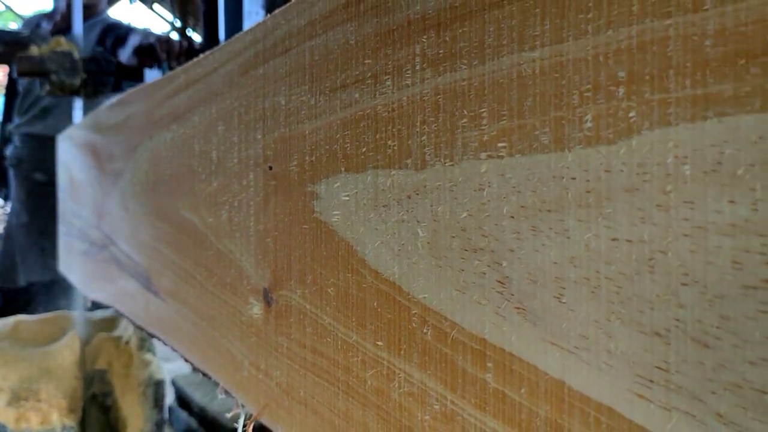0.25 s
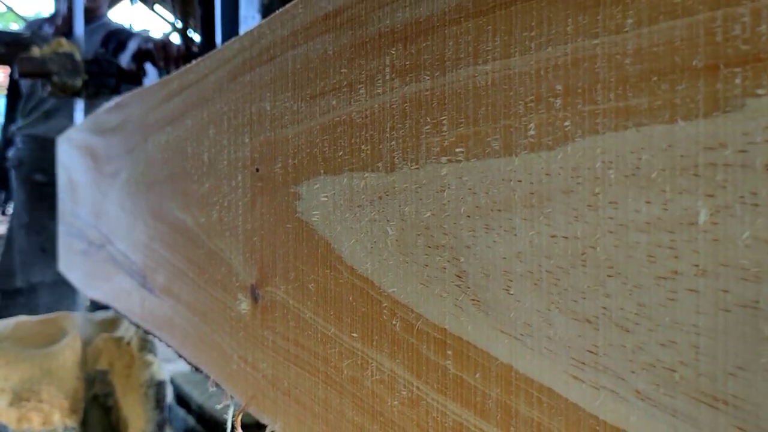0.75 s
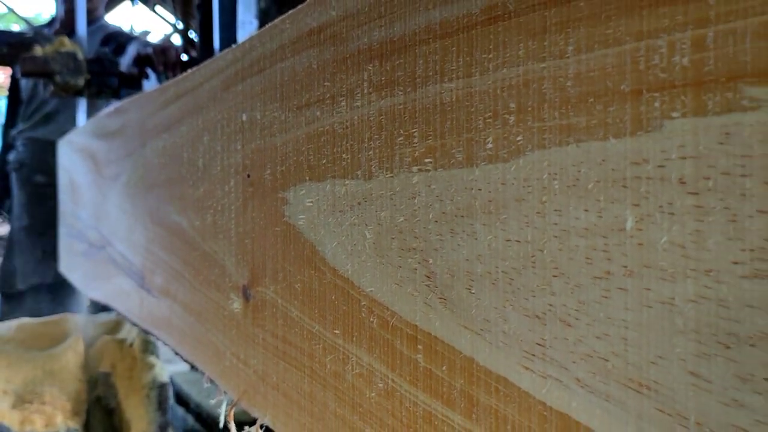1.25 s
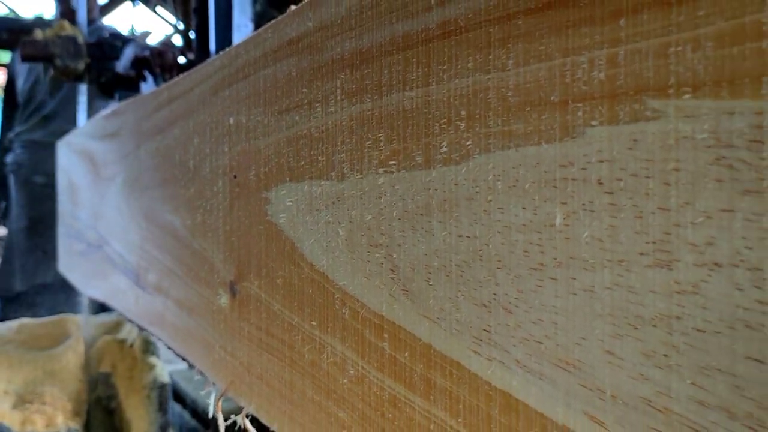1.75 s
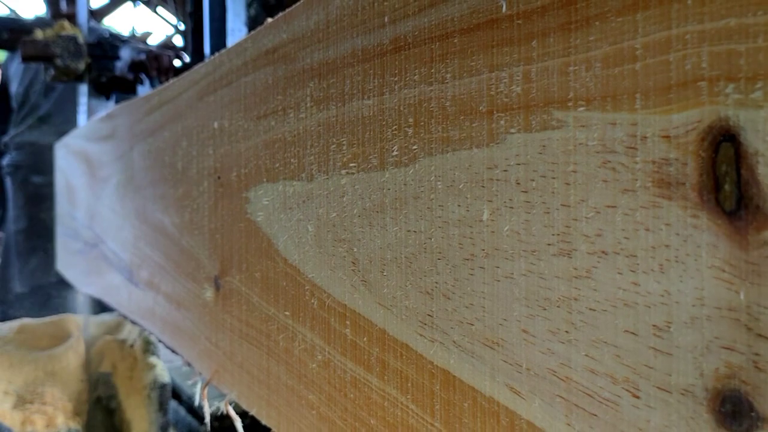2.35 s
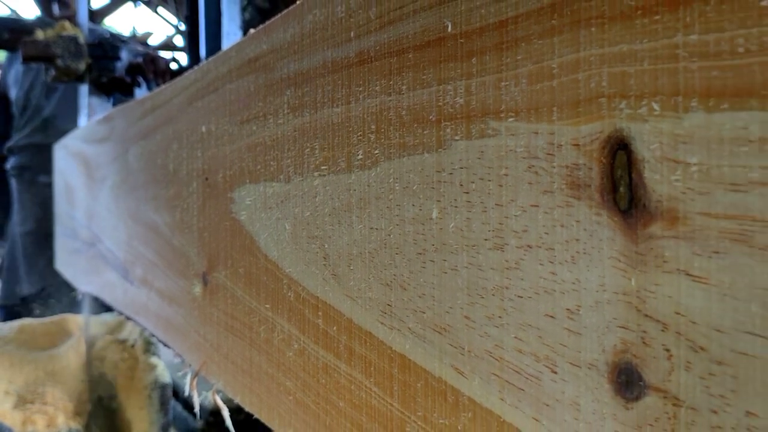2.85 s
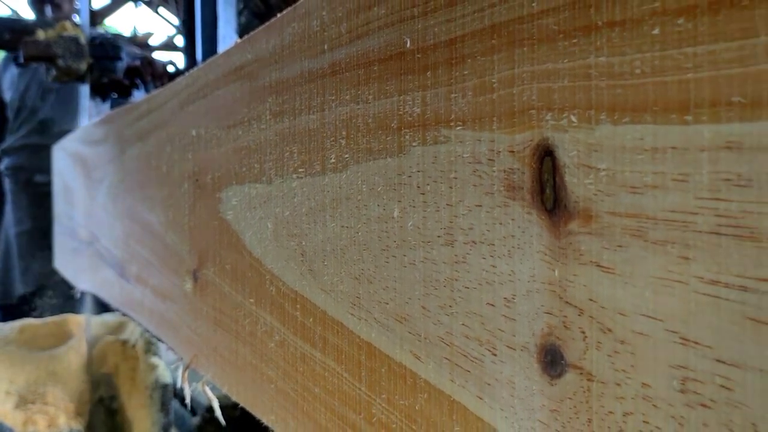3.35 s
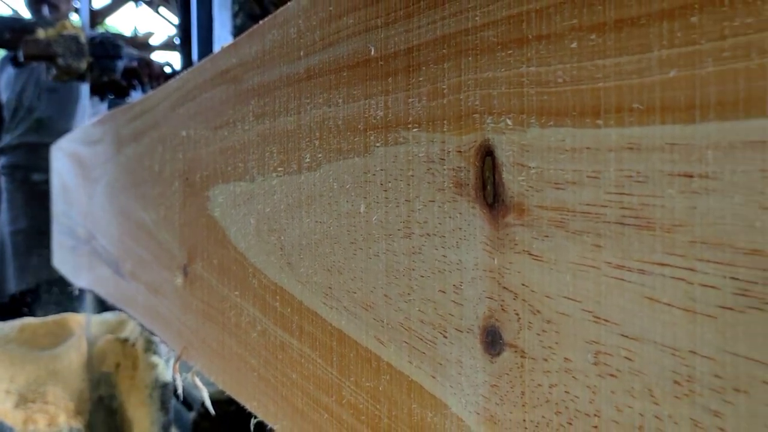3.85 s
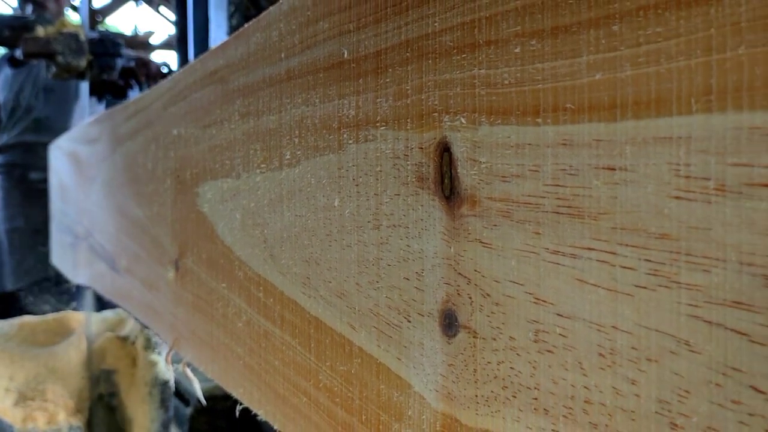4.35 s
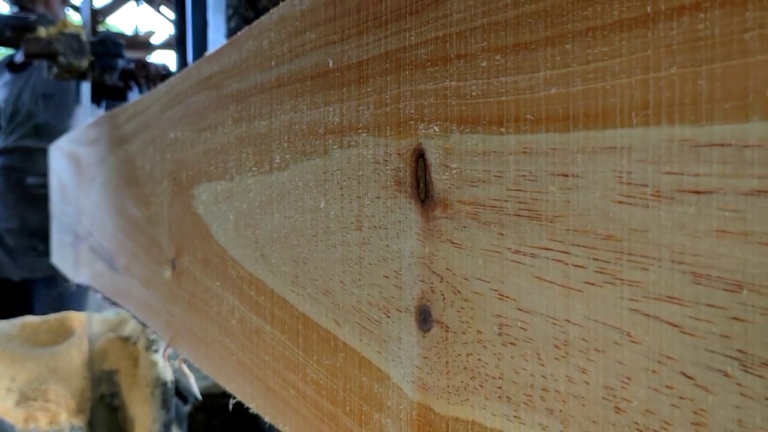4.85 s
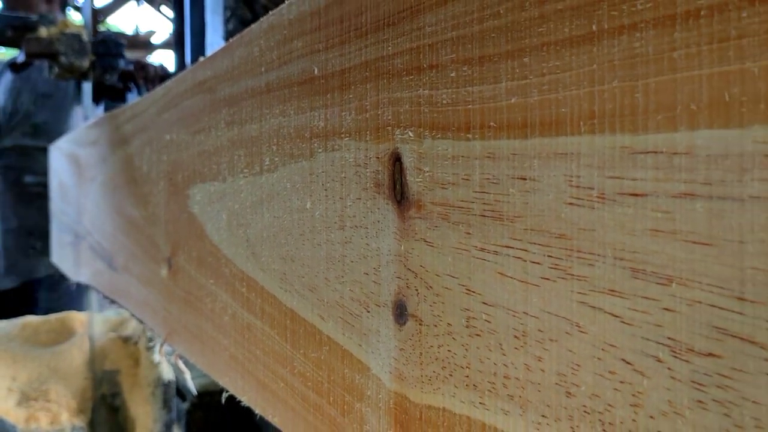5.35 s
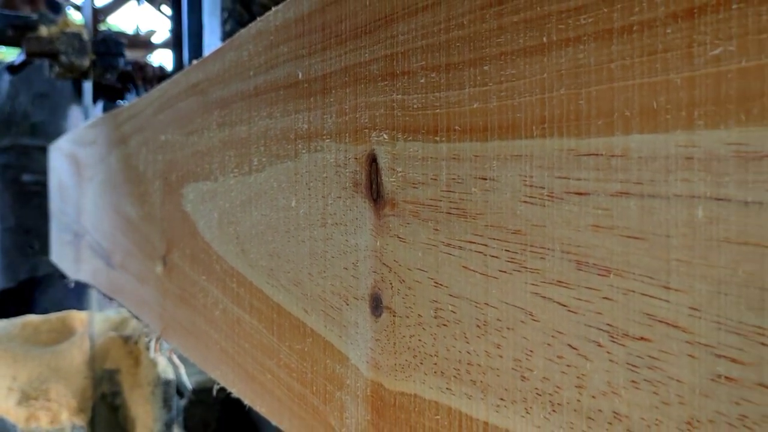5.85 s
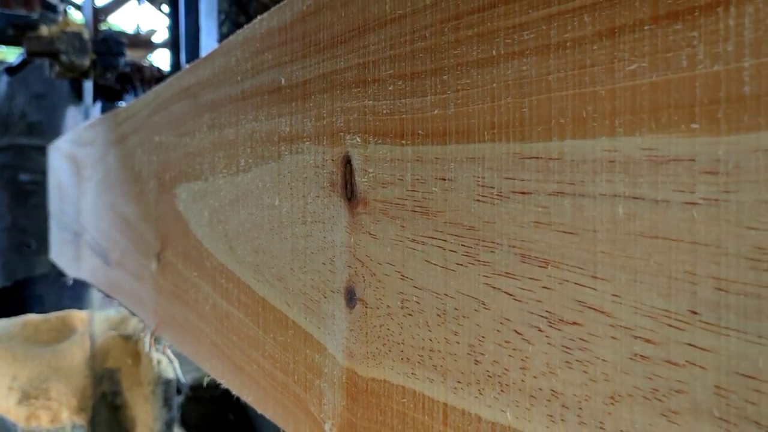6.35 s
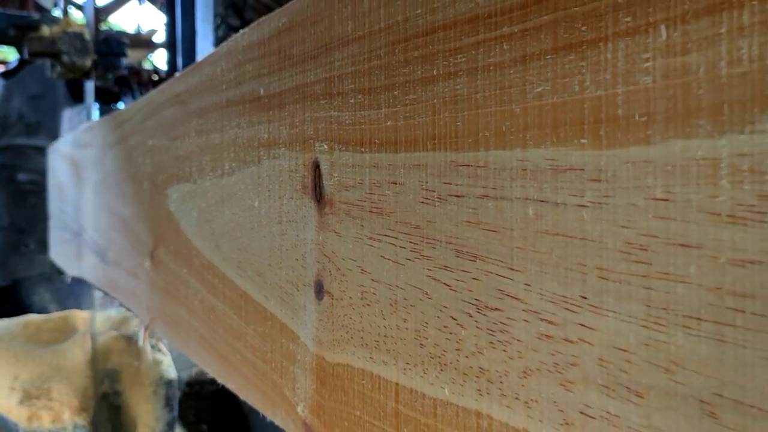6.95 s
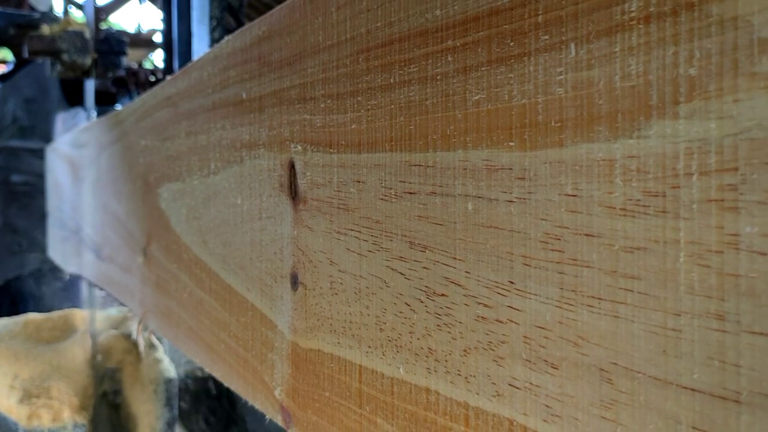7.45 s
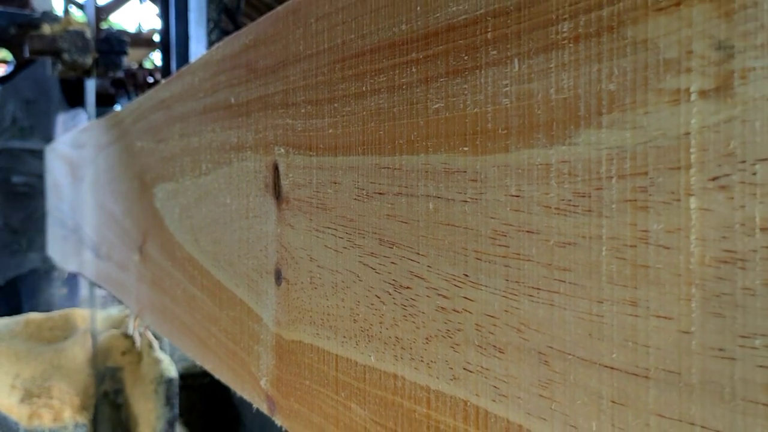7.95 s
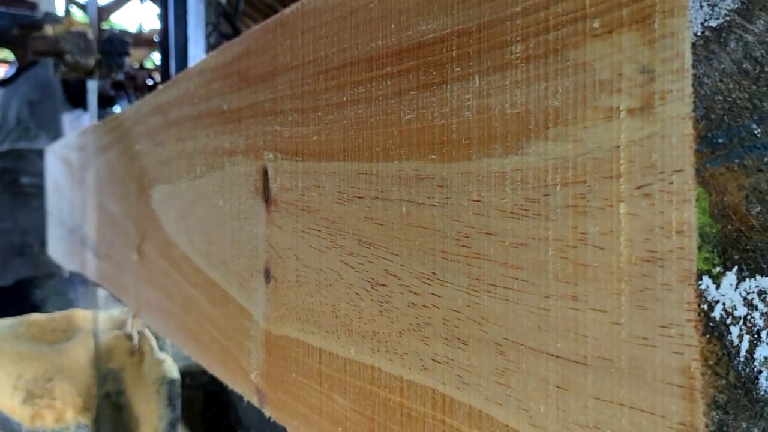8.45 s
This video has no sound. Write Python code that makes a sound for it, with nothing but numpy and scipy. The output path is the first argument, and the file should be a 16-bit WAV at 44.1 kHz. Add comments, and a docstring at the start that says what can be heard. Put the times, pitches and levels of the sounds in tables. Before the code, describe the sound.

A single-cylinder engine chugs and knocks steadily, slowing slightly, while a band saw blade rasps continuously and grittily through a wooden log.

```python
"""Under an open shed, a band mill driven by a single-cylinder four-stroke engine rips a log.
Gritty noise makes the steady rasp of the blade, with two faint whines that swell and fade.
Each engine cycle adds puffs and spits of shaped noise, knocks that ring the casing and a pulse that booms in the pipe.
The engine slows under load. Two microphones a hand apart hear engine and blade from different sides."""
import sys
import numpy as np
from scipy import signal
from scipy.io import wavfile
from scipy.ndimage import uniform_filter1d

SR = 44100
rng = np.random.default_rng(int(sys.argv[2]) if len(sys.argv) > 2 else 0)


def wav_record(signal):
    """Record a signal, one row per channel, as 16-bit PCM in the file named by sys.argv[1]."""
    frames = np.transpose(np.atleast_2d(signal))
    bounded = np.clip(frames, -1, 1)
    # unit amplitude maps onto the largest positive 16-bit level
    quanta = np.round(bounded * 32767).astype(np.int16)
    wavfile.write(sys.argv[1], SR, quanta)


N = 383669

# The engine slowing down: (time [s], crank speed [turns per minute])
CRANK_SPEED = [(0.0, 1632.8), (0.6, 1613.5), (1.3, 1583.4), (2.2, 1565.6), (3.2, 1542.1), (4.3, 1523.1),
               (5.4, 1509.8), (6.5, 1494.5), (7.6, 1477.2), (8.7, 1473.9)]
CYCLE_AT_START = -.258  # cycle count when the sound starts
# Loudness over time: (time [s], casing knocks [dB], hiss puffs [dB], blade rasp [dB])
LOUDNESS = [(0, -28.5, -31, -22), (1.5, -25.5, -30, -22.5), (3, -28, -28, -22.5),
            (4.5, -29.5, -28.5, -22.5), (6, -33.5, -26, -23), (7.5, -33.5, -29, -22), (8.7, -32, -28, -23)]

# Blade whine pitch: (time [s], pitch [multiple of the cycle rate])
WHINE_PITCH = [(0, 40.55), (1.5, 40.4), (2.5, 40.25), (4.5, 40.17), (5.5, 40.07), (8.7, 40.03)]
# Two whines that swell and fade:
# (pitch [multiple of the whine pitch], loudest at [s], time from peak to 6 dB down [s], peak level [dB])
WHINES = [(2, 2.2, 3.6, -42), (1, 5.1, 2.6, -40.5)]
TEETH_PER_S, GRIT_FADE_MS, GRIT_DEPTH = 500, .6, .13  # teeth that catch: average rate, fading time, depth

# Hiss puffs: (place [cycles], relative level at the start [dB], relative change [dB per s], fading time [s])
HISS_PUFFS = [(-.31, 13, -0.3, 0.036), (-.06, -23, 2.4, 0.015), (.13, 10.5, 0, 0.015)]
# Spits at firing and as the exhaust valve opens:
# (place [cycles], peak level at the start [dB], change [dB per s], rise and fading time [s], left lag [ms])
GAS_SPITS = [(-.322, -21, -.35, .002, .15), (-.028, -24.5, .68, .003, 1.11)]

# Knocks on the casing: (place [cycles], relative level [dB])
CASING_KNOCKS = [(-.31, 5.5), (-.16, 6.5), (-.04, 2)]
# Ringing modes of the metal casing: (pitch [Hz], relative level [dB], time to fall 60 dB [s], left lag [ms])
CASING_MODES = [(367, 6.5, 0.0097, 0.46), (527, 6, 0.036, 0.043), (736.6, 12, 0.15, 0.62),
                (675, -23, 0.078, 0.44), (1056, -0.5, 0.18, 0.68), (810, 0, 0.45, 0.78),
                (824.5, 1.5, 0.14, 0.62), (880, -17, 0.087, 0.47), (1358, 2, 0.15, 0.31),
                (1620, -24, 0.036, 0.41), (2130, 9, 0.025, 0.46), (2390, -0.5, 0.064, 0.54),
                (1876, 0.5, 0.068, 0.62), (2540, -4, 0.03, 0.58), (3230, 7, 0.03, 0.43)]

# Exhaust pipe resonances: (pitch at the start [Hz], width [Hz], peak level at the start [dB], change [dB per s])
PIPE_RESONANCES = [(26.8, 3, -36.3, -.31), (39.9, 3, -52.4, .49), (55.6, 3, -38, -.15),
                   (66.2, 3, -42.7, .77), (84, 9.6, -37.1, -.24), (99.9, 14.3, -39.6, 1.34),
                   (109.9, 5.9, -30.7, -5), (119.4, 3.1, -30.9, -1.21), (131.9, 3, -33.2, .17),
                   (157, 3, -19.8, -2.03), (160, 3.5, -34.5, .53), (168.9, 3, -31.5, .05),
                   (199.9, 7.4, -37.7, .79), (219.8, 10.1, -36.7, -1.15), (234.2, 3, -49.6, 2.81),
                   (240.4, 3, -33.5, -3.24), (247.8, 6.6, -29.5, -1.2), (254.8, 4, -36.9, -1.4),
                   (264.2, 3, -36.6, -1.08), (275.4, 3, -51.4, 2.52), (295.5, 3, -43.3, -.34),
                   (305.5, 9.6, -29.4, -3.59), (320.3, 3, -36.5, -4.66), (331.3, 3, -47, .86),
                   (344.2, 3, -54.7, 2.65), (362.8, 28.4, -42.7, -2.38), (533.4, 60, -28.2, -.51)]
PIPE_SAG_PER_S = .0098  # share of their starting pitch that the resonances sink each second
# Delays of the pulse's harmonics, from low throb and hum up to three booms:
# (highest multiple of the cycle rate, delay after the cycle starts [ms])
PULSE_DELAYS = [(2, -1.2), (3, 5.6), (7, 2.34), (12, -.84), (19, 14.87), (24, 31.77), (33, 41.5)]
RUMBLE_DB = -37.5  # noise under the exhaust tones

# Tone colours of the noises, each: (pitch [Hz], relative level [dB])
RASP_TONE = [(200, -30), (380, -6), (600, -4.5), (900, -4.5), (1250, -8), (1550, -4), (2000, 0.5),
             (2500, -0.5), (2700, -6), (2900, -2), (4600, -5), (5050, -10.5), (5430, -8), (5750, -11.5),
             (6200, -12), (7500, -23), (10500, -26.5), (12500, -40.5), (15500, -39)]
PUFF_TONE = [(250, -64), (450, -1.5), (1000, 5), (1400, 7.5), (2000, 4.5), (3200, 11.5), (4500, 5),
             (6000, -12), (8000, -26), (11000, -14.5), (15500, -22)]
BARK_TONE = [(450, -16), (850, 1), (1200, 2), (2200, 0), (3000, -8), (4500, -16), (7000, -35), (15500, -55)]  # the spit at firing
SPIT_TONE = [(500, 5), (900, -5.5), (1800, 7), (2800, 5.5), (4500, 5.5), (5500, -7.5), (7500, -13),
             (15500, -47)]  # the spit as the exhaust valve opens
RUMBLE_TONE = [(15, -16), (35, 2.5), (130, -3.5), (210, -3), (250, 4), (280, 0), (318, 2.5), (350, -6),
               (400, -20.5), (700, -27)]

# Stereo well above SPREAD_HZ: (left lag [ms], share of direct sound); a negative lag reaches the left first
RASP_SIDE, PUFF_SIDE, RUMBLE_SIDE = (-.23, .24), (.45, .85), (.1, .57)
SPIT_DIRECT = .7  # share of direct sound in the spits
SPREAD_HZ, BASS_SAME = 450, .93  # well below this pitch [Hz], the likeness of the two microphones
# Stereo balance of the noises: (pitch [Hz], left over right [dB])
LEFT_OVER_RIGHT = [(250, -7), (450, 3), (800, -2), (1700, 1.9), (2800, 0), (5500, -1), (10000, 1.5),
                   (14000, -0.5)]
EDGE_HZ = 15640  # top of the sound


def gain_of(db):
    """Decibels to gain."""
    return 10 ** (np.asarray(db) / 20)


def evened(x):
    """Scales a sound to an average (rms) strength of 1."""
    return x / np.sqrt(np.mean(x ** 2) + 1e-20)


def curve(rows, column):
    """One column of a time table, joined by straight lines, at every sample."""
    rows = np.asarray(rows)
    return np.interp(np.arange(N) / SR, rows[:, 0], rows[:, column])


def colour_db(table, hz):
    """Level of a tone colour at each pitch, joined along a logarithmic pitch scale."""
    points_hz, db = np.transpose(table)
    return np.interp(np.log(hz + 1), np.log(points_hz), db)


def slow(size):
    """Smooth random drift of rms 1 that changes over about size samples."""
    once = uniform_filter1d(rng.standard_normal(N), size)
    return evened(uniform_filter1d(once, size))


def cycle_rate():
    """Engine cycles per second; a four-stroke fires every second turn."""
    return curve(CRANK_SPEED, column=1) / 120


def cycles():
    """Running count of engine cycles: the cycle rate added up over time."""
    return CYCLE_AT_START + np.cumsum(cycle_rate()) / SR


def blows(place, spread_db, jitter_ms):
    """One click a cycle at the given place, each a little different in size and time."""
    at = np.flatnonzero(np.diff(np.floor(cycles() - place)))
    size, shift = rng.standard_normal((200, 2))[:len(at)].T
    shifted = at + np.round(shift * jitter_ms * SR / 1000).astype(int)
    out = np.zeros(N)
    out[np.clip(shifted, 0, N - 1)] = gain_of(spread_db * size)
    return out


def noise(colour, side, patchy_db):
    """Stereo noise: a direct share that both sides hear, a diffuse rest, and patches that drift in level."""
    frames, hz = N // 256 + 5, np.fft.rfftfreq(1024, 1 / SR)[:, None]
    a, b, c, d, patches = rng.standard_normal((frames, 513, 5)).T
    # smooth the patches over pitch, then over time
    patches = uniform_filter1d(patches, size=6, axis=0)
    patches = evened(uniform_filter1d(patches, size=9, axis=1))
    lag_ms, direct = side
    low = 1 / (1 + (hz / SPREAD_HZ) ** 5)  # near 1 in the bass, near 0 above it
    same = np.clip(low * BASS_SAME + (1 - low) * direct, 0, 1)
    right = a + 1j * b
    diffuse = np.sqrt(1 - same ** 2) * (c + 1j * d)
    delay = np.exp(-2j * np.pi * hz * (1 - low) * lag_ms / 1000)
    left = same * right * delay + diffuse
    z = np.array([left, right]) * gain_of(colour_db(colour, hz) + patchy_db * patches)
    z *= gain_of(np.multiply.outer([.5, -.5], colour_db(LEFT_OVER_RIGHT, hz)))
    return evened(signal.istft(z, nperseg=1024, noverlap=768)[1][:, :N])


def blade():
    """Teeth rasp through the wood in gritty bites; faint whines follow the engine speed."""
    surge = .17 * np.cos(2 * np.pi * (cycles() + .02))  # the belt pulls harder once a cycle
    strikes = (rng.random(N) < TEETH_PER_S / SR) * rng.exponential(1, N)  # single teeth that catch
    grit = signal.lfilter([1], [1, -np.exp(-1000 / (GRIT_FADE_MS * SR))], strikes)
    bite = 1 + surge + GRIT_DEPTH * evened(grit - grit.mean())
    rasp_level = gain_of(curve(LOUDNESS, column=3) + 0.14 * slow(size=3000))
    rasp = rasp_level * bite * noise(RASP_TONE, RASP_SIDE, patchy_db=2.2)
    t, drift = np.arange(N) / SR, 0.12 * slow(size=1500)
    turns = np.cumsum(curve(WHINE_PITCH, column=1) * cycle_rate()) / SR
    whine = np.zeros(N)
    for multiple, loudest_s, half_s, db in WHINES:
        swell_db = db - 6 * ((t - loudest_s) / half_s) ** 2 + .8 * slow(size=9000)
        whine += gain_of(swell_db) * np.sin(2 * np.pi * multiple * turns + drift)
    return rasp + whine


def puffs():
    """Turbulent hiss that swells in a few ms at firing, at the exhaust stroke and just after it, then fades."""
    t, time_s, gate = np.arange(SR // 4) / SR, np.arange(N) / SR, np.zeros(N)
    for place, db, change_db, fade in HISS_PUFFS:
        shape = np.exp(-t / fade) * (1 - np.exp(-t / .002))
        swells = signal.fftconvolve(blows(place, spread_db=.7, jitter_ms=.4), shape)[:N]
        gate += gain_of(db + change_db * time_s) * swells
    hiss = gate * noise(PUFF_TONE, PUFF_SIDE, patchy_db=1.0)
    return gain_of(curve(LOUDNESS, column=2)) * evened(hiss)


def spits():
    """Short bursts of gas noise: a dull bark at firing and a bright spit at the exhaust thump."""
    t, time_s, out = np.arange(SR // 20) / SR, np.arange(N) / SR, np.zeros((2, N))
    for (place, db, change_db, fade, lag_ms), colour in zip(GAS_SPITS, (BARK_TONE, SPIT_TONE)):
        shape = t / fade * np.exp(1 - t / fade)  # peaks at 1
        gate = signal.fftconvolve(blows(place, spread_db=1.0, jitter_ms=.3), shape)[:N]
        hiss = noise(colour, (lag_ms, SPIT_DIRECT), patchy_db=-0.5)
        out += gain_of(db + change_db * time_s) * gate * hiss
    return out


def ring(hz, db, t60, lag_ms=0, rise_ms=2.9):
    """A struck metal mode: a sine that starts softly and dies away."""
    t = np.maximum(np.arange(SR // 2) / SR - lag_ms / 1000, 0)
    fading = gain_of(db - 60 * t / t60)
    return fading * np.sin(2 * np.pi * hz * t) * (1 - np.exp(-1000 * t / rise_ms))


def casing():
    """Combustion and valve knocks ring the metal casing; each mode reaches the left with its own lag."""
    knocks = sum(gain_of(db) * blows(place, spread_db=.8, jitter_ms=.07) for place, db in CASING_KNOCKS)
    left = sum(ring(*mode, rise_ms=1.0) for mode in CASING_MODES)
    right = sum(ring(*mode[:3], rise_ms=0.8) for mode in CASING_MODES)  # no lag
    ringing = gain_of([[-1.5], [1.5]]) * [left, right]
    both = signal.fftconvolve(knocks[None], ringing, axes=1)[:, :N]
    return gain_of(curve(LOUDNESS, column=1)) * evened(both)


def exhaust():
    """A suction pulse each cycle rings the pipe: multiples of the cycle rate grow near its resonances."""
    t, turn, out = np.arange(0, N / SR, .01), cycles(), np.zeros(N)
    uneven_db, slip = .5 * slow(size=2500), 0.0011 * slow(size=2500)  # slip in cycles
    rate = cycle_rate()
    coarse_rate = np.interp(t * SR, np.arange(N), rate)
    for k in range(1, PULSE_DELAYS[-1][0] + 1):
        # raising the pitch here acts as sinking all the resonances
        heard = k * coarse_rate / (1 - PIPE_SAG_PER_S * t)
        pipe = sum(gain_of(db + change_db * t) / (1 + 1j * (heard - hz ** 2 / heard) / width)
                   for hz, width, db, change_db in PIPE_RESONANCES)
        delay_ms = next(ms for top, ms in PULSE_DELAYS if k <= top)
        size = np.interp(np.arange(N) / SR, t, pipe)
        phase = 2 * np.pi * k * (turn + slip - rate * delay_ms / 1000)
        out -= (size * np.exp(1j * phase)).real
    out *= gain_of(uneven_db)
    late = np.r_[np.zeros(7), out][:N]  # the left microphone is farther from the pipe
    rumble = gain_of(RUMBLE_DB) * noise(RUMBLE_TONE, RUMBLE_SIDE, patchy_db=-1.0)
    return np.array([late, out]) + rumble


def scene():
    """Blade and engine together."""
    return blade() + puffs() + spits() + casing() + exhaust()


def record(dry):
    """Cuts the treble above the top of the sound."""
    low_pass = signal.firwin(511, EDGE_HZ, window=("kaiser", 9), fs=SR)
    return signal.oaconvolve(dry, low_pass[None], "same")


dry = scene()
out = record(dry)
wav_record(out)
```